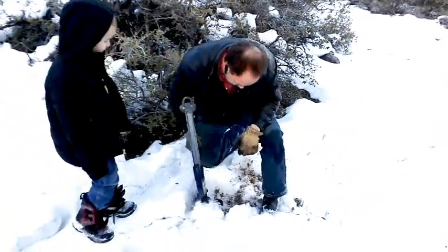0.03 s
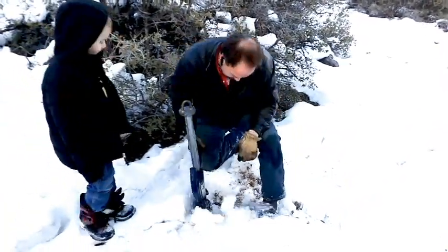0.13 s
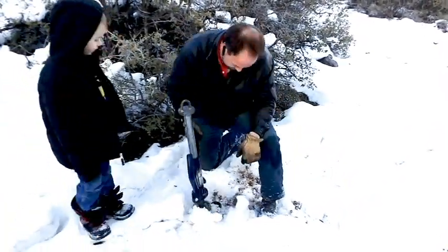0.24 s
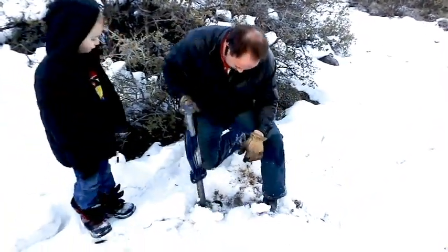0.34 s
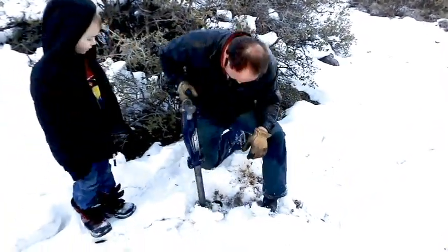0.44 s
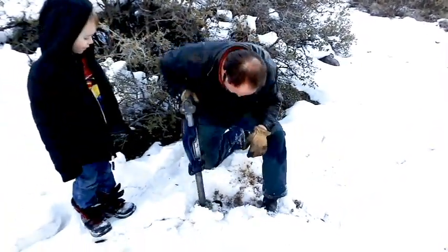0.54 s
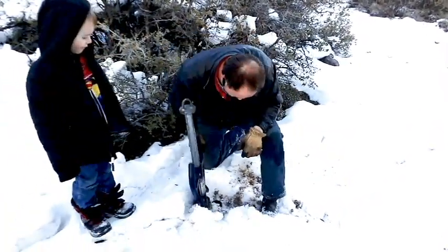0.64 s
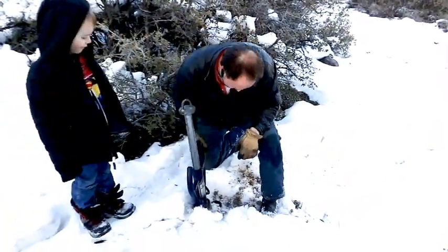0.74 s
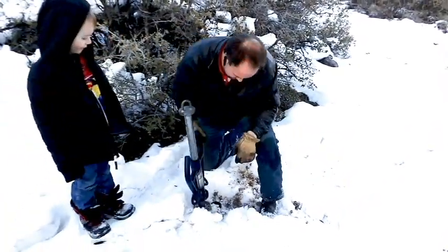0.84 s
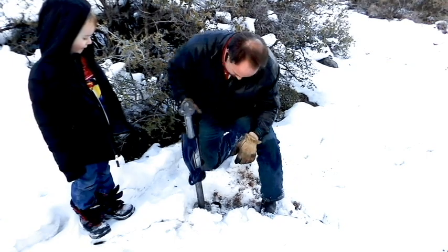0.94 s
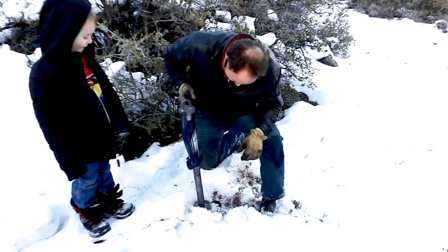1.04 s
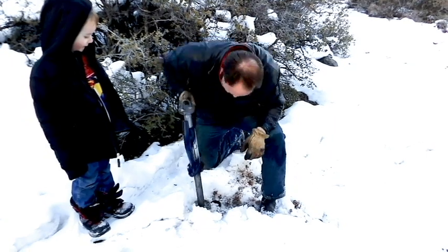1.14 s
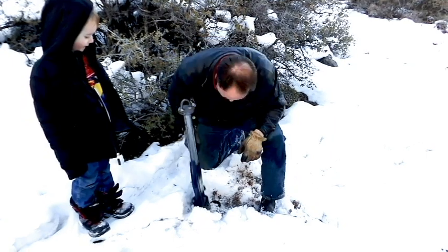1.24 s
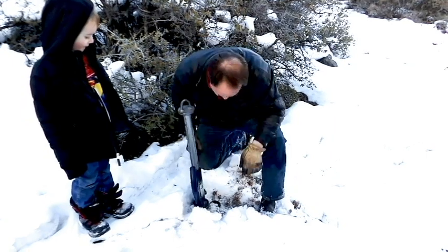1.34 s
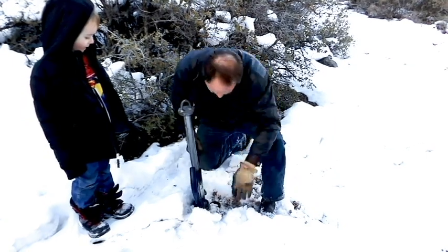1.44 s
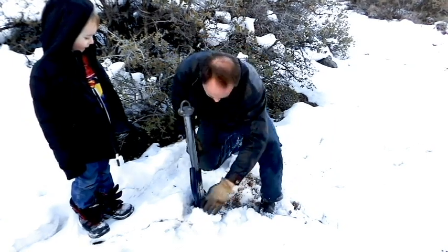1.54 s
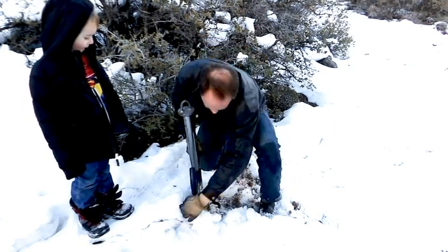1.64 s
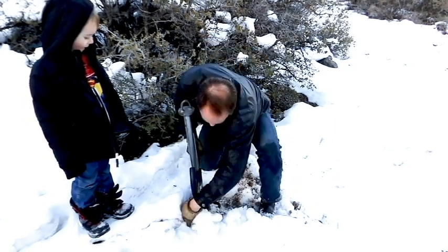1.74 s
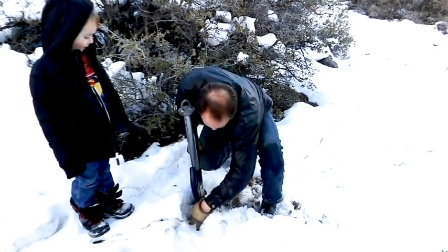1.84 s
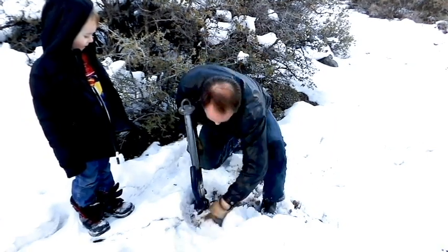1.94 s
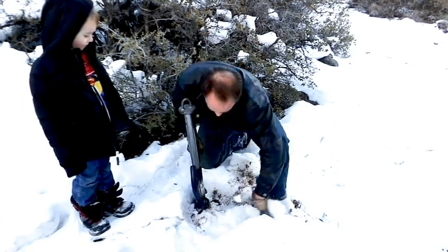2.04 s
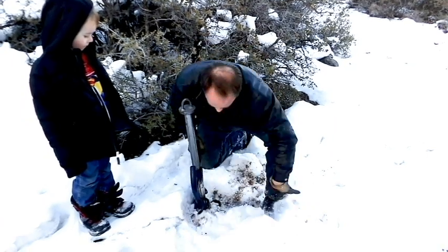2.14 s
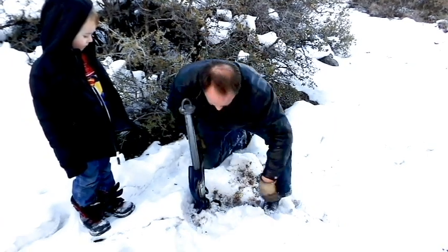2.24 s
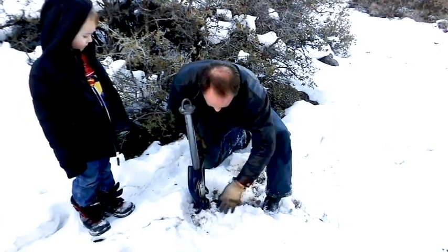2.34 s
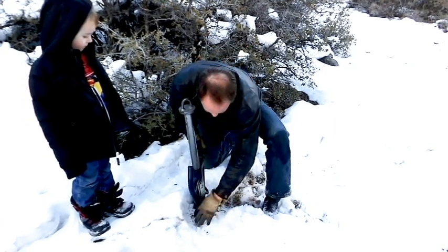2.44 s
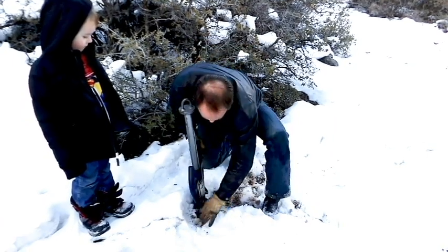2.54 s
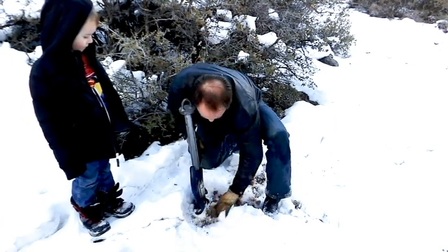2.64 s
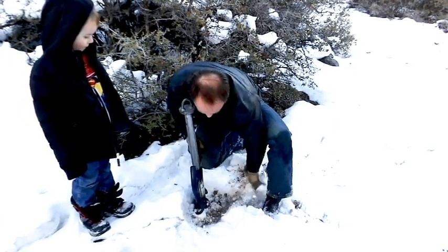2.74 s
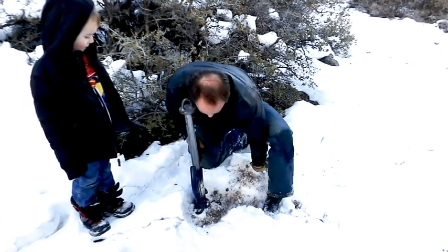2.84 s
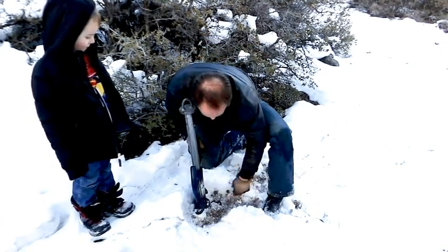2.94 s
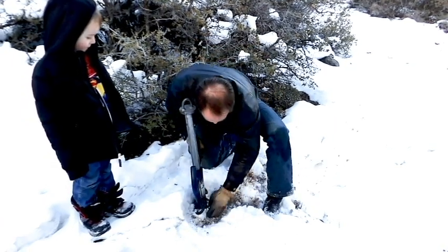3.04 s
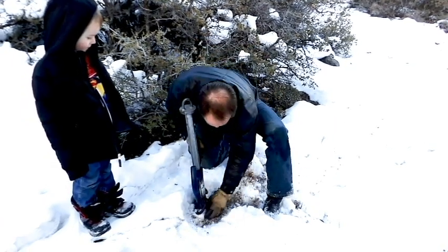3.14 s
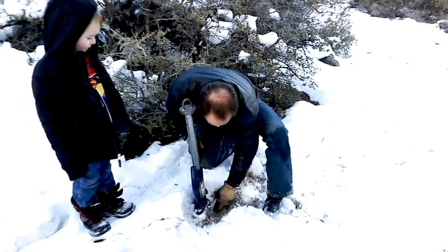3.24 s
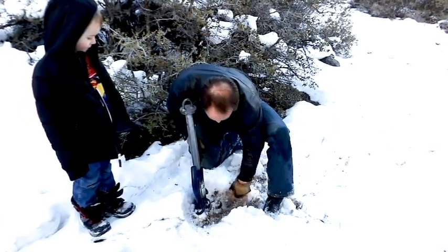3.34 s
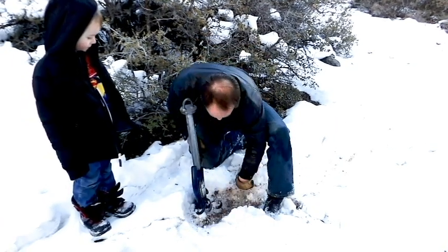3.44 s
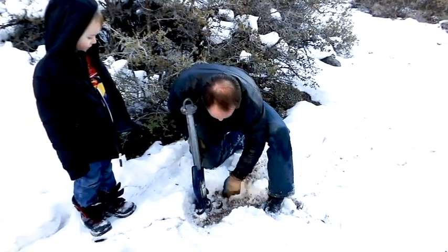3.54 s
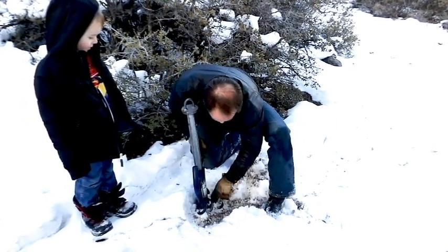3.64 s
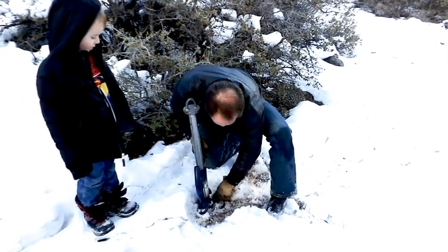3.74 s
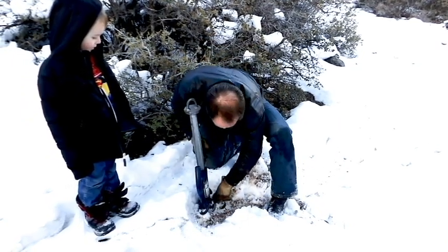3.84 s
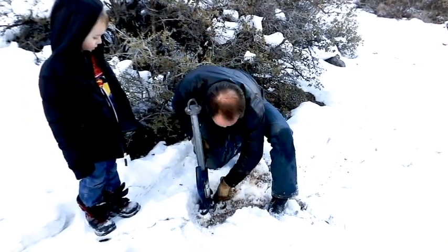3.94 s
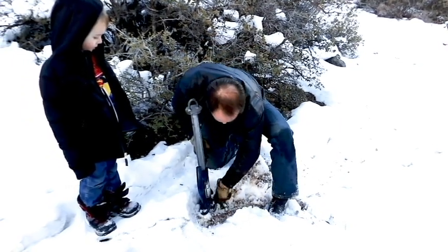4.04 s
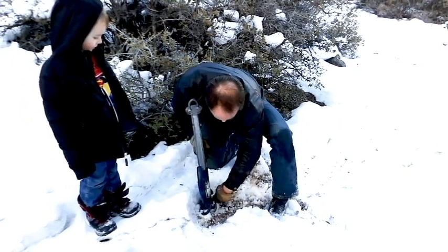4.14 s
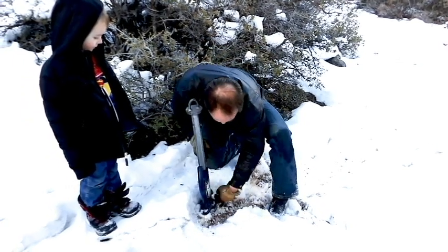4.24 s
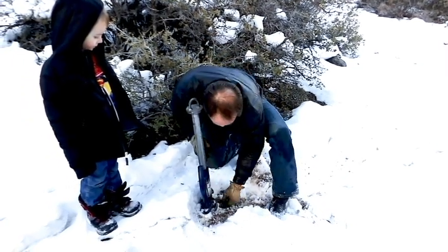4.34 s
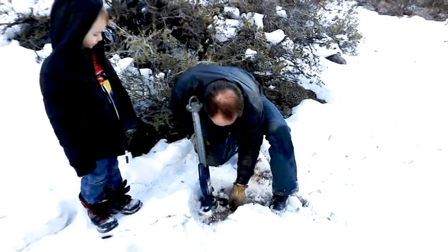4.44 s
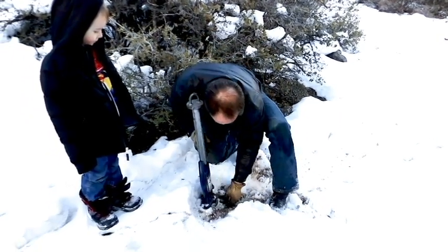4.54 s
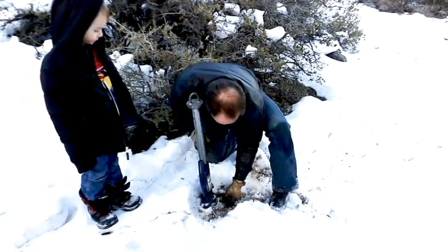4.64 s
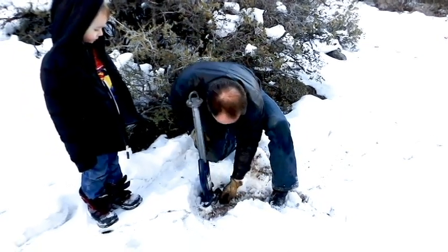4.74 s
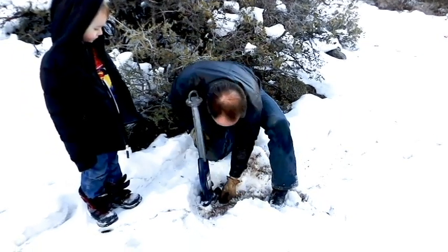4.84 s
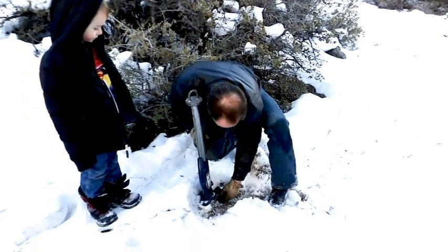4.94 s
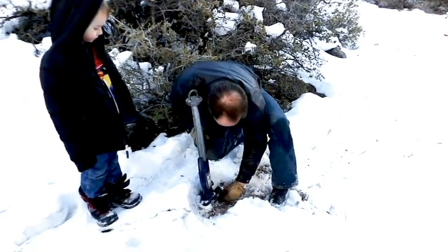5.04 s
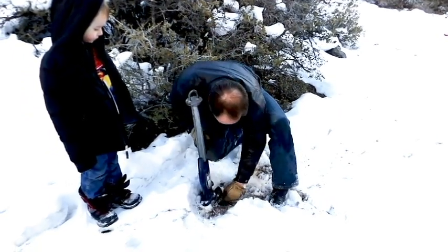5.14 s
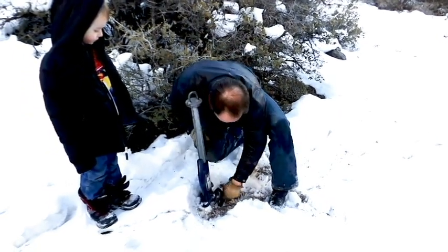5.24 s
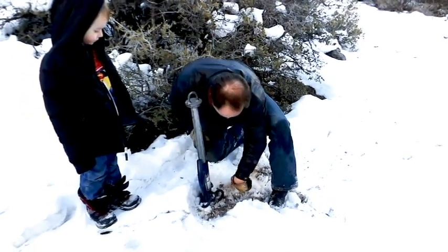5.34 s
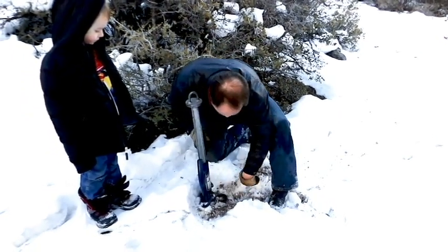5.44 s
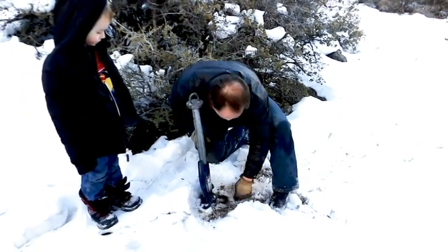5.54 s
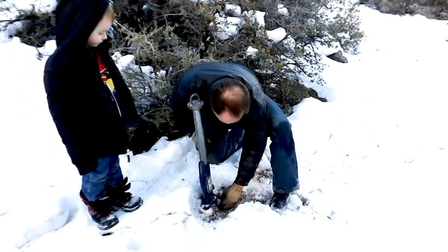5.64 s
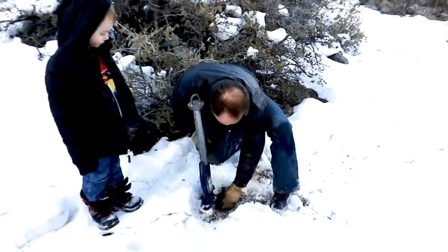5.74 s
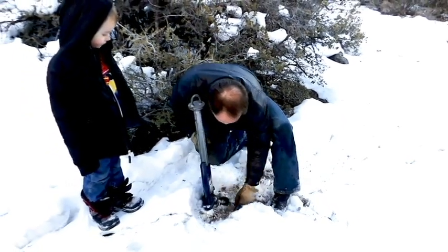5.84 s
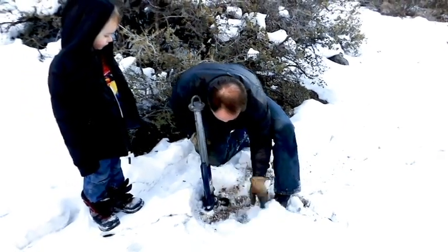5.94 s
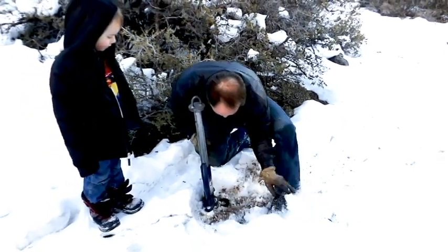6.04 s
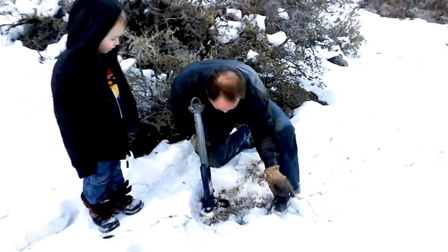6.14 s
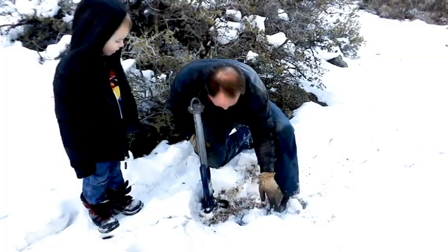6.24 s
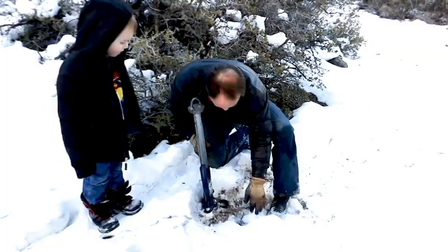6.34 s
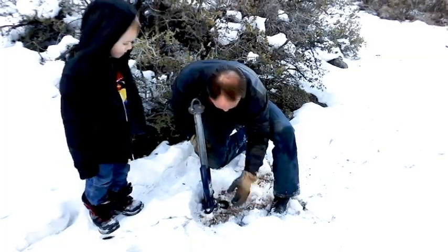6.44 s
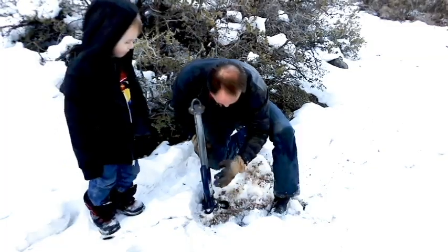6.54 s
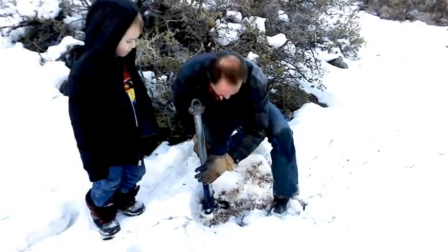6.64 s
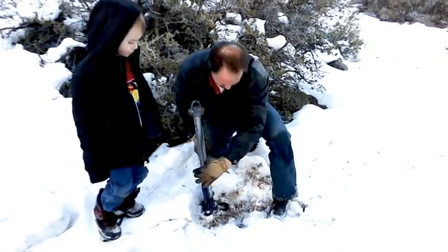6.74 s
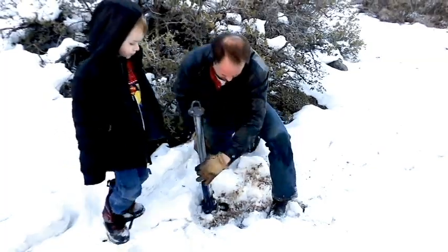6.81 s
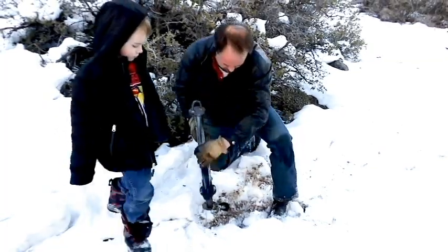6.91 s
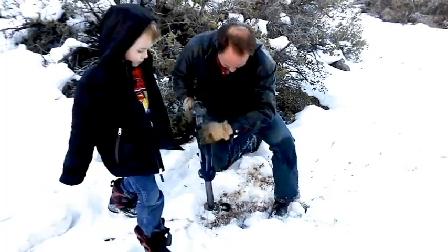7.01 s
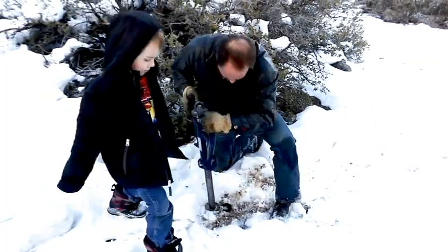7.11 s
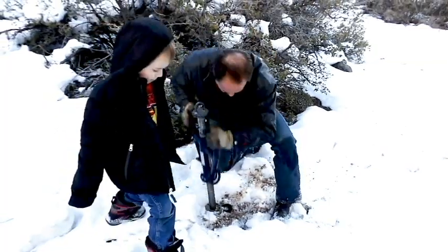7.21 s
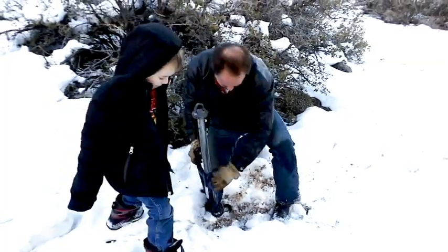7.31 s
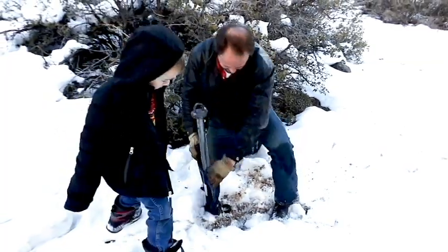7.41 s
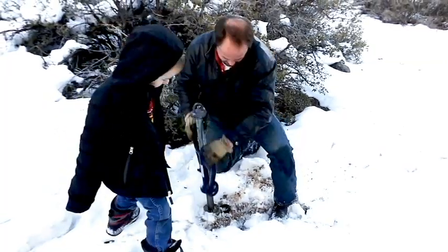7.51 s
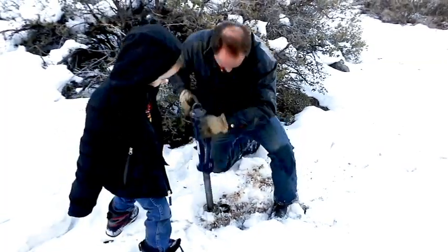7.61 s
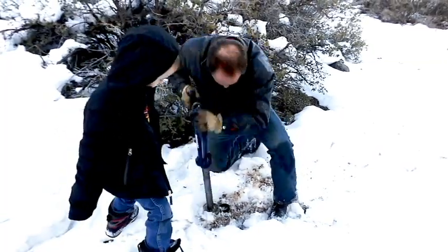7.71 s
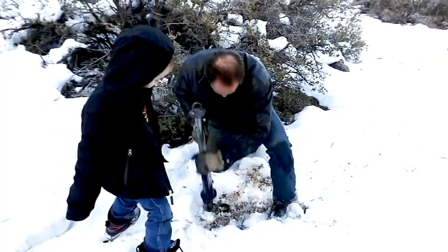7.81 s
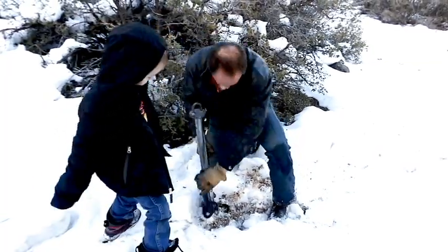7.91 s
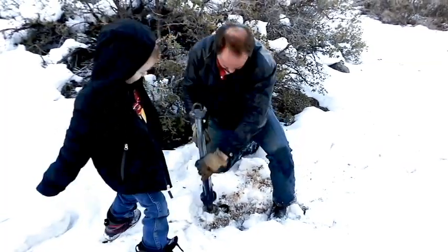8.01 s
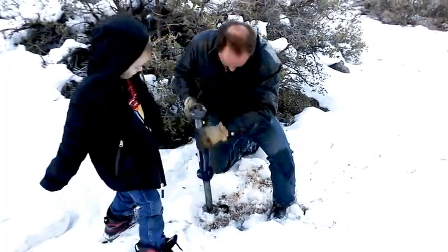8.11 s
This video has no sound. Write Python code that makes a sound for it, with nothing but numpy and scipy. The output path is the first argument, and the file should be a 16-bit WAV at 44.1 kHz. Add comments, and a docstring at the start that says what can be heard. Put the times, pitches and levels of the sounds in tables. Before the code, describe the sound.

Outdoors in snow, a slide hammer strikes a steel anchor rod three times, about 0.6 seconds apart, each a harsh crashing clank with a short bright ring and dull ground thump. A long quiet pause follows with glove sweeps, gritty snow, small clicks, padded knocks and winter clothes rustling. Two more blows land near the end. The close microphone overloads and ducks after each hit, over faint hiss.

```python
"""A slide hammer drives a steel anchor into frozen ground, outdoors in snow, over a faint steady hiss.
Three blows come first: each rings the rod as decaying modes under a noise crash and overloads the microphone.
In the pause a glove sweeps snow and grit (coloured noise and tiny rings), frozen bits click on the rod as
falling chirps, padded knocks puff and winter clothes rustle. Then two more blows land.
Lighter clicks, cracks, rubs and knocks also fall around the blows."""
import sys
import numpy as np
from scipy import signal
from scipy.fft import rfft, irfft
from scipy.io import wavfile
from scipy.ndimage import uniform_filter1d

SR = 44100
rng = np.random.default_rng(int(sys.argv[2]) if len(sys.argv) > 2 else 0)


def master_out(mix):
    """Clip the mix to full scale and print it as 16-bit PCM to the path in sys.argv[1]."""
    frames = np.transpose(np.atleast_2d(mix))
    ceiling = np.clip(frames, -1, 1)
    pcm = np.round(ceiling * 32767).astype(np.int16)
    wavfile.write(sys.argv[1], SR, pcm)


N = 360297
TIME = np.arange(N) / SR   # s
CUTOFF_HZ = 15750

# Event levels are relative; each layer adds its own gain. A t60 is the time in seconds to fall by 60 dB.
# Hammer blows. Each row: start in seconds, force in dB, ring length as a factor,
# seat of the anchor from 0 (shallow) to 2 (deep), level of the scrape down the rod in dB.
BLOWS = [(0.0179, 0.5, 1.26, 0.47, -31), (0.6261, 0.5, 1.274, 0.0068, -55), (1.231, 3, 1.706, 0.83, -50.5),
         (7.264, 6, 1, 1.505, -44), (7.82, 1.5, 1.16, 1.68, -51.5)]
# Modes of rod and hammer. Each row: pitch in Hz, level in dB when shallow, level in dB half way in,
# level in dB when deep, t60 in seconds before the blow's ring length factor.
STEEL_MODES = [(885, -20, -11, -19, .14), (1953, -6, 0, -13, .2), (2009, 4, 4, -4, .22),
               (2041, 9, 4, 6, .19), (2188, -8, -18, -25, .33), (2372, -27, -32, 2, .2),
               (2494, -25, -30, -33, .31), (2562, -25, -16, -16, .25), (2748, -21, -3, -13, .28),
               (2754, -21, -34, -18, .8), (3077, -38, -34, -30, .33), (3335, -14, -23, -21, .24),
               (3377, -24, -22, -19, .28), (3701, -25, -26, -28, .23), (3950, -17, -20, -21, .15),
               (4032, -7, -24, -22, .16), (4420, -22, -20, -2, .15), (5076, -27, -20, -26, .11),
               (5490, -37, -27, -45, .26), (5749, -30, -33, -26, .38), (5819, -34, -22, -13, .28),
               (5905, -15, -19, -19, .22), (6255, -15, -10, -16, .13), (6608, -17, -13, -22, .26),
               (6870, -30, -30, -17, .18), (8750, -31, -40, -7, .29), (13260, -54, -58, -33, .27),
               (14150, -33, -40, -15, .24)]
# Colour of the impact. Each row: frequency in Hz, density in dB per Hz.
CLASH_COLOUR = [(100, -2.5), (400, -5), (850, -2.5), (1400, -7), (2400, -3.5), (4000, -1.5), (6200, -7.5),
                (9000, -11.5), (15000, -16.5)]
# Resonances in which the loose hammer chatters on the rod. Each row: centre in Hz, width in Hz, level in dB.
CHATTER_MODES = [(2980, 200, -9), (3850, 190, 1), (5080, 220, -4.5), (6080, 280, -1)]
# Hard bits clicking on the steel. Each row: start in seconds, level in dB, ring in dB,
# ring length as a factor, low knock in dB, end of the chirp in Hz.
CLICKS = [(0.3146, -32.5, -20, .6, -4, 483), (1.9854, -29.5, -15, 0.41, -20, 1495),
          (4.3208, -32, -28.5, .5, -33, 1940), (4.3355, -26.5, -0.5, 0.74, -8, 720),
          (4.383, -45, -14, .7, -5, 1500), (4.4063, -41, -17, .7, 5, 590),
          (4.685, -21.5, -9, 1.17, -3.5, 500), (5.193, -33, -11, 0.55, -5, 496),
          (5.248, -43.5, -12.5, .6, 9.5, 497), (5.4157, -28, 0, 0.78, -10, 620),
          (6.568, -39, -6, .7, -2, 710), (6.785, -32.5, -4, 0.78, -11, 1900),
          (7.7842, -31.5, -6, 1.04, -34.5, 3020)]
# What the clicks ring with. Each row: pitch in Hz, level in dB, t60 in seconds before the length factor.
CLICK_MODES = [(1203, -11, 0.057), (2051, -14, 0.12), (2647, 4.5, 0.025), (2955, -1, 0.03),
               (3340, -13.5, 0.096), (3890, -0.5, 0.027), (4530, 10, 0.018), (5075, 8, 0.031),
               (7360, -21, 0.096), (10000, -35, 0.02)]
# Snow crust cracking. Each row: start in seconds, level in dB.
CRUNCHES = [(0.311, -37.5), (2.214, -39.5), (2.323, -49.5), (2.436, -41), (2.685, -43.5), (2.887, -48),
            (2.928, -43.5), (3.975, -45.5), (4.021, -47), (5.089, -43), (6.138, -40.5), (6.193, -50),
            (6.376, -38.5), (6.389, -45), (6.913, -39.5)]
# Glove sweeping snow. Each row: start in seconds, length in seconds, swell in seconds, level in dB.
SWEEPS = [(1.624, 0.074, 0.0042, -45), (1.765, 0.25, 0.31, -43.5), (2.478, 0.25, 0.1, -45),
          (3.12, 0.19, 0.044, -45.5), (4.43, 0.055, .02, -59), (5.765, 0.032, 0.046, -42),
          (5.83, 0.1, 0.045, -50.5), (7.415, 0.099, 0.035, -39.5), (7.96, 0.085, .01, -46.5)]
# Hammer lifted along the rod, glove rubbing it.
# Each row: start in seconds, length in seconds, swell in seconds, level in dB.
SLIDES = [(.12, 0.069, 0.018, -35), (3.08, .2, 0.059, -43), (3.34, 0.18, .03, -50.5),
          (3.61, 0.042, 0.022, -56.5), (6.905, 0.028, 0.018, -42), (7.96, 0.076, 0.031, -37)]
# Dull knocks of boots, knee and glove. Each row: start in seconds, level in dB, pitch in Hz.
KNOCKS = [(0.417, -38.5, 256), (1.782, -33.5, 280), (2.712, -29, 514), (3.18, -43, 105), (3.252, -39, 105),
          (3.416, -38, 611), (3.917, -41.5, 549), (6.614, -41, 295), (6.73, -29.5, 208),
          (6.735, -28.5, 520), (7.057, -30, 900), (7.128, -36, 283), (7.6, -34.5, 1690),
          (8.065, -35.5, 246.6)]
# How much the bodies move, heard as rustle of clothes. Each row: time in seconds, level in dB.
EFFORT = [(0.0, -50.5), (0.91, -57.5), (1.09, -61), (1.55, -60), (1.73, -56.5), (4.03, -62.5), (5.87, -62),
          (6.37, -64.5), (7.24, -49), (8.17, -55)]
# Colour of snow. Each row: frequency in Hz, density in dB per Hz.
SNOW_COLOUR = [(29, -44), (50, -10.5), (96, -7), (290, -1.5), (426, -12.5), (778, 4), (944, -4), (2140, -3),
               (2410, -5.5), (2860, 3.5), (6030, -6), (13300, -12), (15800, -14.5)]
# Colour of sliding on the rod. Each row: frequency in Hz, density in dB per Hz.
SLIDE_COLOUR = [(290, -43.5), (500, -4.5), (771, -2.5), (1830, -15), (2090, 5), (2410, -10), (3670, 1),
                (4760, -22), (5190, -7.5), (15800, -33.5)]
# Colour of clothes. Each row: frequency in Hz, density in dB per Hz.
CLOTH_COLOUR = [(20, -42), (50, -23), (100, -6), (270, 0.5), (450, -7.5), (800, -9.5), (1500, -13.5),
                (4000, -17), (15000, -34.5)]
# Colour of the steady hiss. Each row: frequency in Hz, density in dB per Hz.
AIR_COLOUR = [(25, -42.5), (55, -26.5), (140, -22.5), (300, -10), (620, -8.5), (790, -3), (960, -11.5),
              (1700, -15.5), (3400, -10), (4750, -20.5), (5150, -16.5), (6200, -21), (15800, -24.5)]
# Stereo likeness of noise before its width setting. Each row: frequency in Hz, left-right likeness from 0 to 1.
LIKENESS = [(60, 1), (250, 0.98), (1000, 0.94), (3000, 0.85), (8000, 0.15), (15000, 0.25)]

SWEEP_T60_S, SLIDE_T60_S = 0.16, 0.5   # fade once the hand lets go


def from_db(db):
    """Turn decibels into gain."""
    return 10 ** (np.asarray(db) / 20)


def rms_one(x):
    """Scale to unit power."""
    return x / np.sqrt(np.mean(x ** 2) + 1e-20)


def at_hz(points, hz):
    """Read a spectrum on a log-frequency axis."""
    f, value = np.transpose(points)
    return np.interp(np.log(np.maximum(hz, 1)), np.log(f), value)


def add(out, s, sound):
    """Mix a sound in at time s."""
    i = max(round(s * SR), 0)
    out[..., i:i + sound.shape[-1]] += sound[..., :N - i]


def dying(t, t60):
    """Decay exponentially, by 60 dB in t60 seconds."""
    return np.exp(-np.log(1000) * t / t60)


def flutter(per_s):
    """Wander at random with rms 1, joining per_s random points a second by straight lines."""
    knots = rng.standard_normal(N // 20)
    return rms_one(np.interp(TIME * per_s, np.arange(len(knots)), knots))


def noise(spectrum, grain_db=0., apart=0.63):
    """Make stereo noise of a given colour at rms 1; uneven grain sizes make it crackle."""
    hz = np.fft.rfftfreq(N, 1 / SR)
    # each grain lasts 16 samples
    grains = np.minimum(rng.exponential(1, N // 16 + 1), 6)
    sizes = from_db(grain_db * np.repeat(grains, 16)[:N])
    mid, side = rfft(rng.standard_normal((2, N)) * sizes) * from_db(at_hz(spectrum, hz))
    unlike = np.clip(apart * (1 - at_hz(LIKENESS, hz)), 0, 1)
    stereo = np.sqrt(2 - unlike) * mid + np.sqrt(unlike) * side * [[1], [-1]]
    return rms_one(irfft(stereo, N))


def ring(t, hz, t60, spread=0.):
    """Ring one mode in stereo; high modes reach the two ports out of step."""
    phase = rng.choice([-1, 1]) * spread * np.sqrt(hz / SR) * np.array([[1], [-1]])
    return np.sin(2 * np.pi * hz * t + phase) * dying(t, t60)


def hammer(crash_db=8.5, build_s=0.0017, jangle_db=-3.5, jangle_t60=0.22, ground_db=2.5, ground_hz=84):
    """Steel meets steel: a dense crash over the ringing modes of the rod, and a thump in the ground."""
    out, envelope, t = np.zeros((2, N)), np.zeros(N), TIME[:SR]
    crash_t60, ground_t60, longest_t60 = 0.09, 0.06, 0.8   # s
    scatter_t60, scatter_db = 0.19, -18
    for s, force_db, length, seat, _ in BLOWS:
        rise = from_db(force_db) * (1 - np.exp(-t / build_s))
        modes = np.zeros((2, SR))
        for k, (hz, *levels, t60) in enumerate(STEEL_MODES):
            # a loose grip lengthens the ring, most of all in the low modes
            held_t60 = min(t60 * length ** min(1, (2200 / hz) ** 0.5), longest_t60)
            level_db = np.interp(seat, range(3), levels)
            # neighbouring modes start in opposite directions, so close pairs beat the same way on every blow
            modes += (-1) ** k * from_db(level_db) * ring(t, hz, held_t60, spread=1.0)
        add(modes, 0, from_db(jangle_db) * jangle(t[:SR // 3], jangle_t60))
        thump = from_db(ground_db) * ring(t, ground_hz, ground_t60)
        add(out, s, rise * (modes + thump))
        # the bushes scatter a short wash that outlasts the crash
        wash = from_db(scatter_db) * dying(t, scatter_t60 * length ** 0.5)
        crash = from_db(crash_db) * dying(t, crash_t60)
        add(envelope, s, rise * (crash + wash))
    return out + envelope * noise(CLASH_COLOUR, apart=0.4)


def jangle(t, t60, count=130):
    """Ring the many weak, short modes of the fittings, struck differently each time; high ones die sooner."""
    pitches = rng.uniform(600, 11000, count)   # Hz
    sizes = rng.standard_normal(count) * from_db(at_hz(CLASH_COLOUR, pitches)) / np.sqrt(count)
    return sum(size * ring(t, hz, t60 * (4000 / hz) ** 0.051, spread=1.0)
               for hz, size in zip(pitches, sizes))


def chatter(buzz_db=-17.0, buzz_t60=0.24, drop_db=-42.5, uneven_db=3.0, drop_s=0.065):
    """The loose hammer rattles on its way down, then buzzes on the rod, longer after a longer ring."""
    t, envelope = TIME[:SR], np.zeros(N)
    for s, force_db, length, *_ in BLOWS:
        add(envelope, s, from_db(force_db + buzz_db) * dying(t, buzz_t60 * length))
        # the rattle grows over drop_s and stops as the hammer lands
        drop = np.sqrt(np.clip(1 + (TIME - s) / drop_s, 0, 1)) * (TIME < s)
        envelope += from_db(drop_db) * drop
    hz = np.geomspace(1000, CUTOFF_HZ, num=600)
    response = sum(from_db(db) / (1 + (2 * (hz - centre) / width) ** 2)
                   for centre, width, db in CHATTER_MODES)
    colour = np.transpose([hz, 20 * np.log10(response)])
    return envelope * from_db(uneven_db * flutter(150)) * noise(colour, grain_db=2.5)


def downstrokes(growth_t60=0.7, rattle_db=3.0):
    """The hammer gathers speed down the rod, so its scrape swells right up to the blow."""
    envelope = sum(from_db(db) * dying(np.abs(s - TIME), growth_t60) * (TIME < s)
                   for s, *_, db in BLOWS)
    return envelope * from_db(rattle_db * flutter(150)) * noise(SLIDE_COLOUR, grain_db=3.0)


def clicks(start_hz=5800, glide_s=0.0022, chirp_db=0.0, swell_s=0.0017, grit_db=1.5,
           knock_db=-6.5, knock_hz=230, vary_db=1.5):
    """Bending waves arrive treble first: a quick falling chirp, then a short ring, a low knock and grit."""
    out, t, envelope = np.zeros((2, N)), TIME[:SR // 5], np.zeros(N)
    knock_shape = np.exp(-((t - 0.009) / 0.0023) ** 2)   # centred 9 ms in
    knock = from_db(knock_db) * np.sin(2 * np.pi * knock_hz * t) * knock_shape
    rise = 1 - np.exp(-t / swell_s)
    for s, peak_db, ring_db, length, low_db, end_hz in CLICKS:
        cycles = np.cumsum(end_hz + (start_hz - end_hz) * np.exp(-t / glide_s)) / SR
        chirp = from_db(chirp_db) * np.sin(2 * np.pi * cycles) * t / swell_s * np.exp(1 - t / swell_s)
        modes = np.zeros((2, len(t)))
        for hz, db, t60 in CLICK_MODES:
            # each bit lands on another spot, so it shares its energy among the modes in its own way
            level_db = db + ring_db + vary_db * rng.standard_normal()
            modes += from_db(level_db) * ring(t, hz, t60 * length, spread=1.0)
        add(out, s, from_db(peak_db) * (chirp + rise * modes + from_db(low_db) * knock))
        add(envelope, s, from_db(peak_db + grit_db) * rise * dying(t, 0.016))
    return out + envelope * noise(CLASH_COLOUR)


def crunches(gain_db=3.5, t60=0.074, swell_s=0.00057, crumbs_per_s=2.5, crumb_db=-54.5, crumb_spread_db=1.5):
    """The crust gives way in short sprays of grains; fainter crumbs break at random times."""
    envelope, t = np.zeros(N), TIME[:SR // 5]
    crumb_starts = np.flatnonzero(rng.random(N) < crumbs_per_s / SR)
    crumbs = [(i / SR, crumb_db + crumb_spread_db * rng.standard_normal()) for i in crumb_starts]
    for s, peak_db in CRUNCHES + crumbs:
        add(envelope, s, from_db(peak_db + gain_db) * (1 - np.exp(-t / swell_s)) * dying(t, t60))
    return envelope * noise(SNOW_COLOUR, grain_db=4.5)


def grit(grit_db=-4.5, count=3000):
    """Ice grains tumble under the glove, each with a tiny ring of its own pitch."""
    out, t = np.zeros((2, N)), TIME[:SR // 60]
    for when, pitch, size in rng.random((count, 3)):
        hz = 1400 * 9 ** pitch
        grain = ring(t, hz, 12 / hz, spread=0.8)
        # cubing the size makes most grains faint; half the snow's slope in dB colours them
        add(out, when * TIME[-1], size ** 3 * from_db(at_hz(SNOW_COLOUR, hz) / 2) * grain)
    return from_db(grit_db) * strokes(SWEEPS, SWEEP_T60_S) * rms_one(out)


def rubbing(sweep_db=4.0, slide_db=-6.0, fidget_db=-0.5, catch_db=2.5, fold_db=1.5, sleeve_db=-15.5):
    """Snow grains under the glove, the hammer on its rod and folds of cloth, all catching and slipping."""
    sweeping = strokes(SWEEPS, SWEEP_T60_S)
    sliding = strokes(SLIDES, SLIDE_T60_S)
    fidgeting = from_db(fidget_db + np.interp(TIME, *np.transpose(EFFORT)))
    # the sleeve moves along with the sweeping glove
    moving = fidgeting + swings() + from_db(sleeve_db) * sweeping
    snow = from_db(sweep_db + catch_db * flutter(70)) * sweeping * noise(SNOW_COLOUR, grain_db=-1.0)
    slide = from_db(slide_db + catch_db * flutter(160)) * sliding * noise(SLIDE_COLOUR, grain_db=0.0)
    cloth = from_db(fold_db * flutter(35)) * moving * noise(CLOTH_COLOUR, grain_db=-5.5)
    return snow + slide + cloth


def strokes(rows, t60, ease_db=10.5, contact_s=0.002):
    """Gain of hand strokes: each makes contact, builds pressure by ease_db over its swell, holds and fades."""
    out, t = np.zeros(N), TIME[:SR]
    for s, length_s, swell_s, db in rows:
        pressure = from_db(db - ease_db * np.clip(1 - t / swell_s, 0, 1))
        contact = 1 - np.exp(-t / contact_s)
        add(out, s, pressure * contact * dying(np.maximum(t - length_s, 0), t60))
    return out


def swings(swing_db=-45, growth_t60=0.31, settle_t60=0.72):
    """Gain of the sleeve's swish: it grows as the arm comes down and settles after the blow."""
    swish = sum(dying(np.abs(TIME - s), np.where(TIME < s, growth_t60, settle_t60)) for s, *_ in BLOWS)
    return from_db(swing_db) * swish


def knocks(gain_db=-7.0, swell_s=0.0059, width=1.7):
    """Padded contacts: a soft puff of noise around one broad resonance."""
    out, t = np.zeros((2, N)), TIME[:SR // 10]
    for s, peak_db, hz in KNOCKS:
        band = signal.butter(2, [hz / max(width, 1.1), hz * width], "band", fs=SR, output="sos")
        puff = rms_one(signal.sosfilt(band, rng.standard_normal(len(t))))
        add(out, s, from_db(peak_db + gain_db) * puff * t / swell_s * np.exp(1 - t / swell_s))
    return out


def outdoor_air(air_db=-57.0):
    """A faint, steady outdoor hiss of coloured noise."""
    return from_db(air_db) * noise(AIR_COLOUR)


def scene():
    """The blows, then the handwork around the rod, over the hiss."""
    blows = hammer() + chatter() + downstrokes()
    handwork = clicks() + crunches() + grit() + rubbing() + knocks()
    return blows + handwork + outdoor_air()


def gain_control(x, threshold_db=-4.5, depth_db=7.0, late_s=0.041, release_db_per_s=28.5):
    """A loud sound turns the gain down a moment late; it then creeps back."""
    power = uniform_filter1d(np.mean(x ** 2, axis=0), size=64)
    level_db = 10 * np.log10(np.maximum(power, 1e-12))
    cut_db = np.clip(level_db - threshold_db, 0, depth_db)
    # hold the deepest cut so far, released at a steady rate
    release_db = release_db_per_s * TIME
    held_db = np.maximum.accumulate(cut_db + release_db) - release_db
    late_db = np.interp(TIME - late_s, TIME, held_db, left=0)
    return x * from_db(-uniform_filter1d(late_db, size=160))


def record(dry, lopsided=0.3):
    """The overloaded input flattens upward swings and folds deep downward swings back toward zero."""
    x = gain_control(dry)
    fold_start, fold_slope, fold_rest = 1.0, 1.0, 0.02
    folded = np.minimum(fold_slope * (-x - fold_start) - fold_start, fold_rest)
    driven = np.where(x < -fold_start, folded, np.minimum(x, 1))
    # even below overload the input is lopsided, which adds the octave of a loud ring
    driven = driven + lopsided * driven ** 2 * (1 - driven ** 2)
    # a steep low-pass removes the top
    lowpass = signal.ellip(10, 0.1, 80, CUTOFF_HZ, fs=SR, output="sos")
    return signal.sosfilt(lowpass, driven)


dry = scene()
out = record(dry)
master_out(out)
```